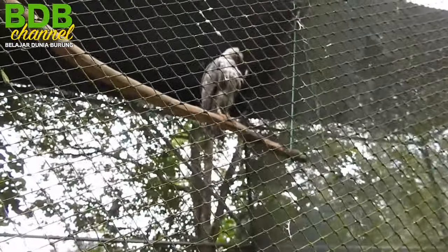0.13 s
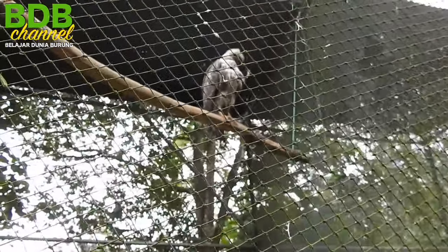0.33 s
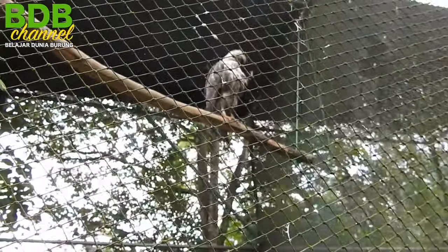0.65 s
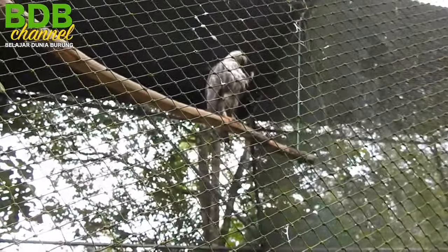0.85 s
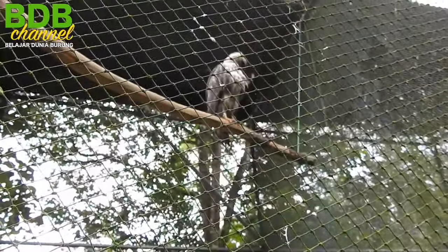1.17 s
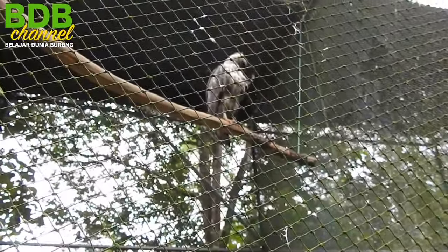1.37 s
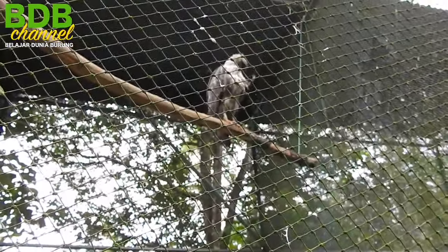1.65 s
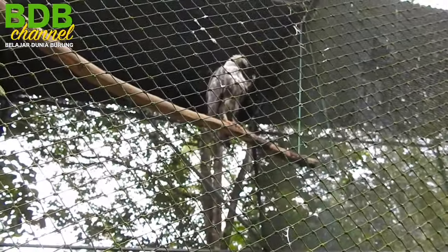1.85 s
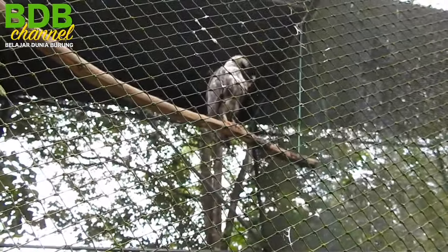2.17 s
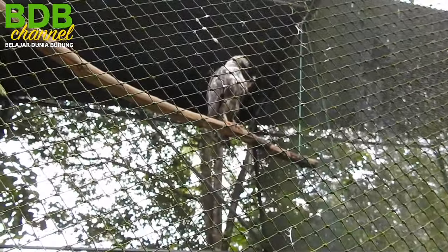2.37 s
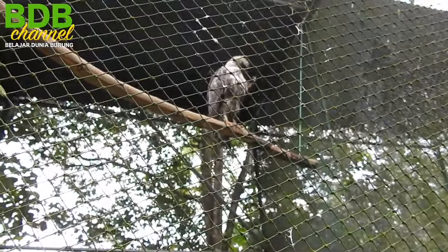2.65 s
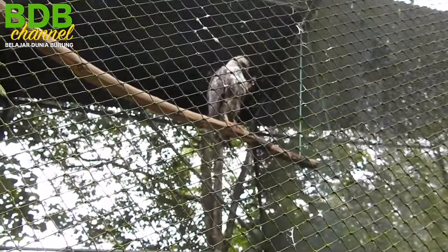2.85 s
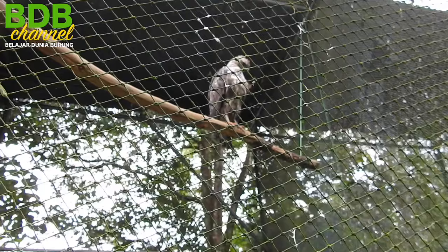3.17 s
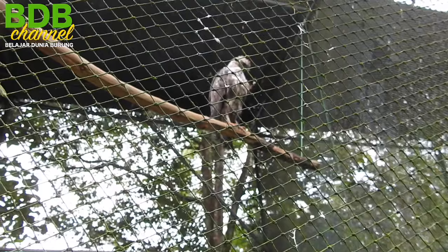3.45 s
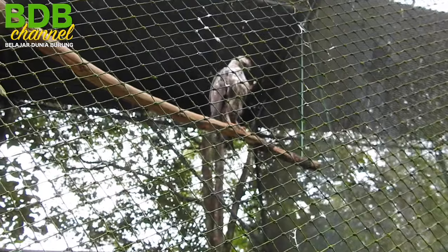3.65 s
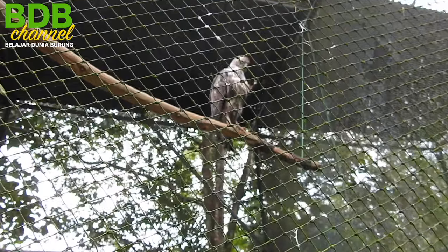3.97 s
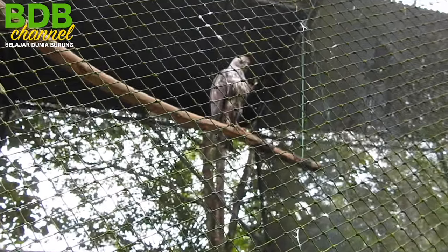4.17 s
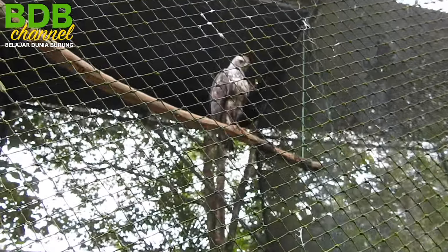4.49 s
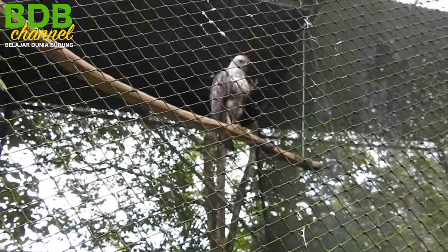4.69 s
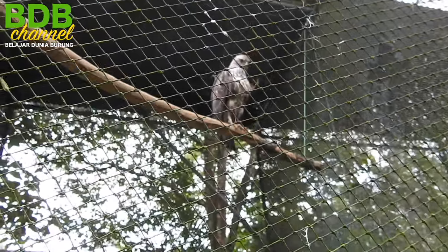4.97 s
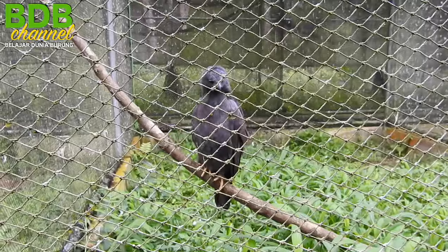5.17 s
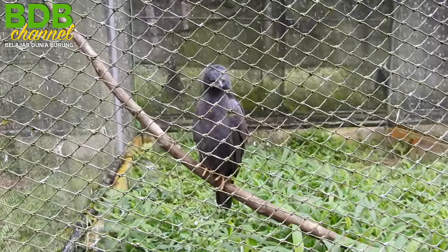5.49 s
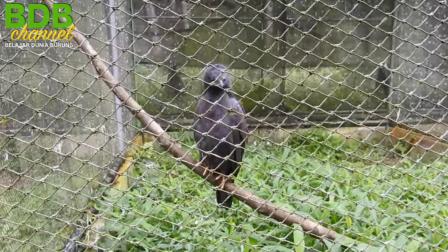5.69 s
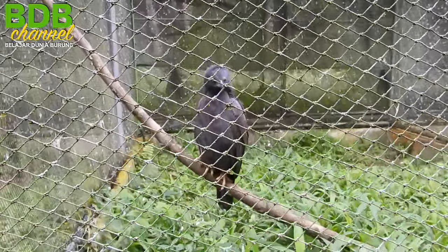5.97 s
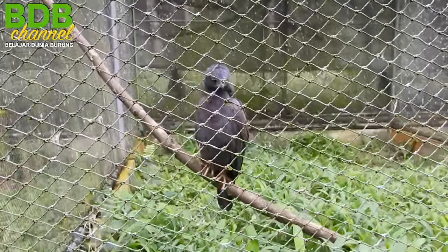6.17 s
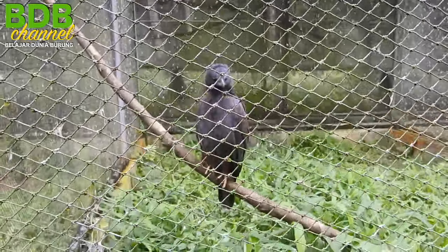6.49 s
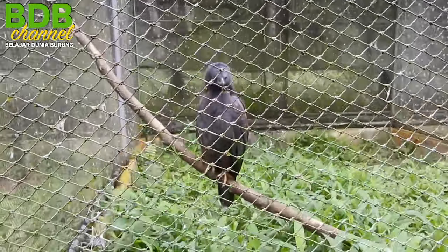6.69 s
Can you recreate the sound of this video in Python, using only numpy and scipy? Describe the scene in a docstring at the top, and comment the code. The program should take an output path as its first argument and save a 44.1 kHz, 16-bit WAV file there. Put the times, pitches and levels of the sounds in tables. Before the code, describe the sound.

Outdoors in an aviary, steady air noise and a high insect-like hiss. Two barely audible yelps, then two clearer hoarse ones from the left, the second loud. Thin high peeps and a soft chirp follow sparsely while a distant bird whistles faintly. Just after five seconds a soft chirp runs into a piercing close scream, then a shorter one; hard walls ring briefly, and strong wind thumps the stereo microphone.

```python
"""Two sharp bird screams close by, in an outdoor aviary: partials of a vibrating membrane that frays and collapses.
Before them come hoarse yelps, thin peeps and soft chirps, built the same way as short pitch arches.
A far bird whistles in wavering sines; light taps are ticks of dying noise.
Behind lie coloured noise for air and an insect-like hiss, and wind buffeting the microphone ports.
Decaying noise stands for the hard cage walls that answer every call."""
import sys
import numpy as np
from scipy import signal
from scipy.fft import rfft, irfft, next_fast_len
from scipy.io import wavfile
from scipy.ndimage import uniform_filter1d, minimum_filter1d, map_coordinates

SR = 44100
rng = np.random.default_rng(int(sys.argv[2]) if len(sys.argv) > 2 else 0)


def store_wav(level_fs):
    """Save 16-bit WAV to argv[1]."""
    pcm = np.round(np.clip(np.atleast_2d(level_fs), -1, 1) * 32767)
    wavfile.write(sys.argv[1], SR, pcm.T.astype(np.int16))


N = 301644


def amp(db):
    """Decibels to gain."""
    return 10 ** (np.asarray(db) / 20)


def unit(x):
    """Scaled to rms 1."""
    return x / np.sqrt(np.mean(x ** 2) + 1e-20)


def along(points, hz):
    """(f/Hz, value) points interpolated on a log frequency axis."""
    f, v = np.transpose(points)
    return np.interp(np.log(hz + 1), np.log(f + 1), v)


def curves(rows, t):
    """Each column after the time, read at the times t."""
    s, *cols = np.transpose(rows)
    return [np.interp(t, s, c) for c in cols]


def wobble(rate_hz, size):
    """Smooth random curve, rate_hz knots a second."""
    knots = rng.standard_normal(int(size * rate_hz / SR) + 4)
    return map_coordinates(knots, [np.arange(size) * rate_hz / SR])


def filtered(x, response):
    """x times a response of frequency."""
    m = next_fast_len(N + SR // 2)
    spectrum = rfft(x, m) * response(np.fft.rfftfreq(m, 1 / SR))
    return irfft(spectrum, m)[..., :N]


def panned(db):
    """Left and right gains for a level difference."""
    return amp(np.array([[.5], [-.5]]) * db)


def add(track, s, sound):
    """Mix a sound in at time s."""
    part = track[..., round(s * SR):][..., :sound.shape[-1]]
    part += sound[..., :part.shape[-1]]


def arch(start, middle, end, u):
    """Parabola through three values as u runs from 0 to 1."""
    return np.polyval(np.polyfit([0, .5, 1], [start, middle, end], 2), np.clip(u, 0, 1))


def rush(spectrum, alike):
    """Coloured stereo noise of rms 1; the mid/side angle sets the left-right correlation."""
    def response(hz):
        angle = np.arccos(np.clip(along(alike, hz), -1, 1)) / 2
        return amp(along(spectrum, hz)) * [np.cos(angle), np.sin(angle)]

    mid, side = filtered(rng.standard_normal((2, N)), response)
    return unit(np.array([mid + side, mid - side]))


# air noise: f/Hz, relative density/dB
AIR_SPECTRUM = [(15, -69), (25, -11.5), (86, 1), (183, 0), (221, -5), (322, -6), (378, -8), (421, -7),
                (648, -7.5), (703, -10), (997, -12.5), (2700, -19), (6730, -13), (10600, -42.5),
                (15500, -42)]
# insect-like hiss: f/Hz, relative density/dB
HISS_SPECTRUM = [(2500, -19), (4500, -14.5), (5600, -9.5), (6600, -4.5), (7300, -13.5), (8200, -20.5),
                 (11000, -35.5), (15000, -50)]
# likeness of the two ports: f/Hz, left-right correlation
PORT_CORRELATION = [(60, 0.84), (200, 0.96), (700, 0.9), (2400, 0.76), (4400, 0.74), (8000, 0.14),
                    (15000, .1)]
AIR_DB, HISS_DB = -41.5, -39
HISS_FALL_S, HISS_FALL_LENGTH_S, HISS_FALL_DB = 5.05, .26, 3.5


def outdoors():
    """Steady wide air noise under a high, slightly wavering hiss that steps down once."""
    fall = np.clip((np.arange(N) / SR - HISS_FALL_S) / HISS_FALL_LENGTH_S, 0, 1)
    hiss_db = HISS_DB - HISS_FALL_DB * fall + 0.61 * wobble(15, N)
    air = amp(AIR_DB) * rush(AIR_SPECTRUM, PORT_CORRELATION)
    return air + amp(hiss_db) * rush(HISS_SPECTRUM, PORT_CORRELATION)


def buffeting(spectrum, lump_db):
    """Turbulence rumbles almost independently at each port, in quick lumps."""
    lumps = unit(amp(lump_db * np.array([wobble(28, N), wobble(28, N)])))
    return lumps * rush(spectrum, [(100, 0.032)])


# light breeze: f/Hz, relative density/dB
BREEZE_SPECTRUM = [(11, -48), (18, -25), (47, -2), (70, 3.5), (118, -4.5), (178, -12), (225, -21.5),
                   (260, -21), (340, -60), (570, -120)]
# separate puffs: middle t/s, length/s, level/dB, L-R/dB
BREEZE_PUFFS = [(0.018, .1, -23, 6), (0.234, 0.16, -33.5, -1.5), (0.365, 0.083, -29, 11),
                (0.59, 0.39, -33, 2), (0.836, 0.29, -26.5, -8.5), (1.174, 0.44, -35.5, -1),
                (1.782, 0.15, -34.5, -13.5), (2.034, 0.13, -38, -12), (2.205, 0.13, -44, -12),
                (4.366, 0.13, -35.5, 9), (4.511, .11, -27, 3), (4.8, 1, -43, 2)]


def breeze():
    """Light puffs of turbulence under half-cosine swells, each with its own left-right balance."""
    t = np.arange(N) / SR
    strength = np.zeros((2, N))
    for s, length, db, pan_db in BREEZE_PUFFS:
        swell = np.cos(np.pi * np.clip((t - s) / length, -.5, .5))
        strength += amp(db) * panned(pan_db) * swell
    return strength * buffeting(BREEZE_SPECTRUM, lump_db=1.5)


# strong wind: t/s, level/dB, L-R/dB before the width factors
STRONG_WIND_CURVE = [(5.1, -19.5, -26.5), (5.21, -18.5, -6), (5.332, -24, -19), (5.434, -17, -8),
                     (5.478, -18, -18), (5.578, -27.5, -17), (5.856, -15.5, 2), (5.948, -13, -9),
                     (6.024, -19, 8), (6.044, -34, 0.0), (6.112, -20, 12), (6.2, -43, -1.5),
                     (6.276, -28.5, -1), (6.428, -41, 10), (6.486, -31, -7.5), (6.534, -28, 16),
                     (6.572, -41.5, 3), (6.796, -21.5, 6), (6.84, -22, -1)]
# strong wind: f/Hz, relative density/dB
STRONG_WIND_SPECTRUM = [(12, -47), (20, -31.5), (63, 4), (117, 1.5), (157, -6), (209, -9.5), (238, -23),
                        (286, -25.5), (439, -50.5), (600, -39), (780, -63), (1320, -120)]
# eddies hitting the ports: t/s, level before attack and decay/dB, f/Hz
EDDY_THUMPS = [(5.096, -10.5, 87), (5.391, -7.5, 132), (5.437, -5.5, 143), (5.726, -8.5, 140),
               (5.808, -21, 105), (5.828, -4, 138), (5.914, -6, 115), (6.777, -9, 72.5)]


def strong_wind(wind_width=0.79, thump_width=0.69, fade_in_s=.015):
    """Strong turbulence, heard late in the scene behind a very short fade-in; eddies are decaying low sines."""
    t = np.arange(N) / SR
    db, pan_db = curves(STRONG_WIND_CURVE, t)
    fade_in = np.clip((t - STRONG_WIND_CURVE[0][0]) / fade_in_s + 1, 0, 1)
    turbulence = buffeting(STRONG_WIND_SPECTRUM, lump_db=1.5)
    out = fade_in * amp(db) * panned(wind_width * pan_db) * turbulence
    t = np.arange(SR // 10) / SR
    attack = 1 - np.exp(-t / 0.00096)
    for s, level_db, hz in EDDY_THUMPS:
        thump = amp(level_db - 60 * t / 0.048) * np.sin(2 * np.pi * hz * t) * attack
        add(out, s, thump * panned(thump_width * pan_db[round(s * SR)]))
    return out


# light taps on the cage: t/s, level before TAP_TRIM_DB/dB, f/Hz
CAGE_TAPS = [(2.012, -20, 1090), (2.077, -16.5, 2050), (6.118, -12.5, 6300)]
TAP_TRIM_DB, TAP_T60_S, TAP_TOP_HZ = -16, 0.059, 6000


def taps():
    """Short dull ticks, each a broad resonance of dying noise."""
    out, t = np.zeros((2, N)), np.arange(SR // 8) / SR
    for s, db, hz in CAGE_TAPS:
        tick = signal.lfilter(*signal.iirpeak(hz, 1.2, SR), rng.standard_normal(len(t)))
        add(out, s, amp(db + TAP_TRIM_DB - 60 * t / TAP_T60_S) * unit(tick))
    return filtered(out, lambda hz: 1 / (1 + (hz / TAP_TOP_HZ) ** 6))


# late tail of the walls: f/Hz, t60/s
CAGE_DECAY = [(300, 0.13), (2200, 0.82), (5000, 0.73), (10000, 0.7)]


def cage(x, early_db, early_t60_s, spread):
    """Wall answer: early echoes with their own decay plus a tail, partly alike at both ports."""
    hz, t, z = signal.stft(rng.standard_normal((2, SR * 3 // 4)), SR, nperseg=256)
    late = amp(-60 * t / along(CAGE_DECAY, hz)[:, None])
    early = amp(early_db - 60 * t / early_t60_s)
    mid, side = signal.istft(z * (late + early) * (t > .005), SR, nperseg=256)[1]
    tail = np.array([mid + spread * side, mid - spread * side])
    return signal.fftconvolve(x, tail / np.linalg.norm(tail[0]), axes=1)[:, :N]


# far bird: t/s, first note length/s, first note f/Hz, mid-note level/dB,
# second note length/s (sounds only above MIN_SECOND_S)
FAR_WHISTLES = [(.465, 0.51, 1367, -51, 0), (.68, 0.26, 2936, -47.5, 0.1), (2.007, 0.4, 2930, -51, 0.43),
                (3.48, .15, 2994, -49, 0.29), (4.745, 0.15, 2998, -47, 0.52),
                (5.66, 0.37, 3065, -51.5, 0.48)]
MIN_SECOND_S, SECOND_AFTER_S, SECOND_RATIO, SECOND_DB = .1, .11, .738, 0.5  # second note re first


def far_bird(waver=0.012, fade_db=6):
    """Wavering sine whistles, often overlapped by a lower note, each fading a little."""
    out, notes = np.zeros((2, N)), []
    for s, length, hz, db, second_length in FAR_WHISTLES:
        notes.append((s, length, hz, db))
        if second_length > MIN_SECOND_S:
            notes.append((s + SECOND_AFTER_S, second_length, hz * SECOND_RATIO, db + SECOND_DB))
    for s, length, hz, db in notes:
        size = int(length * SR)
        phase = 2 * np.pi * np.cumsum(hz * (1 + waver * wobble(163, size))) / SR
        level = amp(db + fade_db * np.linspace(.5, -.5, size))
        add(out, s, level * np.sin(phase) * signal.windows.tukey(size, .25))
    return out + amp(-1) * cage(out, early_db=-26, early_t60_s=.2, spread=0.37)


def syrinx(pitch_hz, rough, jitter, rasp_hz):
    """Phase of the vibrating membrane, and the random complex swing that blurs partials into a rasp."""
    size = len(pitch_hz)
    phase = 2 * np.pi * np.cumsum(pitch_hz * (1 + jitter * wobble(300, size))) / SR
    pole = np.exp(-2 * np.pi * rasp_hz / SR)
    noise = rng.standard_normal((2, size))
    swing = unit(signal.lfilter([1], np.poly([pole, pole]), noise))
    return phase, rough * (swing[0] + 1j * swing[1])


def partial(multiple, phase, rasp, lead_rad):
    """One partial at both ports, lead_rad apart; the higher it lies, the more it rasps."""
    port_phase = multiple * phase + np.array([[.5], [-.5]]) * lead_rad
    return np.imag((1 + multiple * rasp) * np.exp(1j * port_phase))


def call(length_s, hz, db, rough, start, end, sag, overtone_db, closing_db, lead_rad, release_s, hoarse):
    """A call swells along a pitch arch, then flicks down and frays as the pressure drops."""
    # start, end: shares of hz; sag: share of pitch lost; hoarse: rasp factor of the overtones
    t = np.arange(int((length_s + release_s) * SR)) / SR
    slack = np.clip((t - length_s) / release_s, 0, 1)
    pitch_hz = hz * arch(start, 0.98, end, t / length_s) * (1 - sag * slack)
    phase, rasp = syrinx(pitch_hz, rough + 1.1 * sag * slack, jitter=0.0054, rasp_hz=460)
    swell_db = np.interp(t / length_s, [0, .25, .55, .85, 1.05], [-15, -3, 0, -1, closing_db])
    swell_db -= 16 * slack
    voice = partial(1, phase, rasp, lead_rad)
    for k, level_db in enumerate([overtone_db, overtone_db - 13], 2):
        voice = voice + amp(level_db) * partial(k, phase, hoarse * rasp, k * lead_rad)
    return voice * amp(db + swell_db) * signal.windows.tukey(len(t), .08)


def perched(s, sound, pan_db, echo_db):
    """A call at time s, placed left-right, with the answer of the walls."""
    out = np.zeros((2, N))
    add(out, s, sound * panned(pan_db))
    return out + amp(echo_db) * cage(out, early_db=9.0, early_t60_s=0.26, spread=0.26)


# thin peeps: t/s, length before release/s, start f/Hz, reference f/Hz (2 % above mid-call),
# end f/Hz, level/dB
THIN_PEEPS = [(2.669, .062, 4480, 4295, 4410, -30), (4.21, .05, 4410, 4300, 4090, -28)]


def peeps():
    """High, almost level notes whose pitch drops sharply in the release."""
    out = np.zeros((2, N))
    for s, length, start_hz, hz, end_hz, db in THIN_PEEPS:
        peep = call(length, hz, db, rough=.11, start=start_hz / hz, end=end_hz / hz, sag=0.4,
                    overtone_db=-22, closing_db=-2, lead_rad=-1.15, release_s=0.022, hoarse=1)
        out += perched(s, peep, pan_db=2, echo_db=-6)
    return out


# soft chirps: t/s, length before release/s, reference f/Hz (2 % above mid-call), level/dB,
# octave re fundamental/dB, echo/dB
CHIRPS = [(3.668, 0.066, 1570, -25.5, -5, -9), (5.003, 0.074, 1629, -18, -11.5, -34)]


def soft_chirps():
    """Low, clean, shallow pitch arches with a strong octave, near the centre."""
    out = np.zeros((2, N))
    for s, length, hz, db, overtone_db, echo_db in CHIRPS:
        chirp = call(length, hz, db, rough=0.026, start=0.93, end=0.92, sag=0.044,
                     overtone_db=overtone_db, closing_db=-3, lead_rad=0.19, release_s=0.02, hoarse=0.82)
        out += perched(s, chirp, pan_db=1.0, echo_db=echo_db)
    return out


# hoarse yelps: t/s, length before release/s, reference f/Hz (2 % above mid-call), level/dB,
# roughness (ratio), opening rasp level/dB
HOARSE_YELPS = [(0.385, 0.053, 2120, -46.5, .3, -60), (.585, .07, 2066, -44, 1, -46),
                (.86, .06, 1989, -24.5, 0.17, -34), (1.191, 0.07, 2154, -14.5, 0.04, -37.5)]
CATCH_LEAD_S, CATCH_HZ = .02, 2123  # opening rasp


def yelps():
    """From the left: a rasp opens each yelp, which clears into a pitch arch with a ragged overtone."""
    out = np.zeros((2, N))
    for s, length, hz, db, rough, catch_db in HOARSE_YELPS:
        catch = call(CATCH_LEAD_S * 1.5, CATCH_HZ, catch_db, rough=0.6, start=1.01, end=0.89, sag=0.07,
                     overtone_db=-25, closing_db=-17, lead_rad=.3, release_s=.025, hoarse=1)
        overtone_db = np.interp(rough, [.05, .2], [-24, -16])
        yelp = call(length, hz, db, rough, start=.835, end=0.93, sag=.36, overtone_db=overtone_db,
                    closing_db=-17.5, lead_rad=.15, release_s=.04, hoarse=1.5)
        out += perched(s - CATCH_LEAD_S, catch, pan_db=9.0, echo_db=5)
        out += perched(s, yelp, pan_db=8.5, echo_db=-2.0)
    return out


# near screams: t/s, time before the held pitch/s (a short low note, only about 2 ms in the first), held
# length/s, # start f/Hz, middle f/Hz, end f/Hz, fundamental before trim/dB, its dip before the hollow curve/dB,
# # octave before trim/dB, overtone growth over the call/dB, third harmonic re octave/dB, # fundamental L-R/dB
NEAR_SCREAMS = [(5.092, 0.0021, .18, 2655, 2629, 2577, -9, 25, -14, -9.5, -16, 0.5),
                (5.558, .021, .086, 2483, 2517, 2485, -14.5, 7.5, -22, 7.5, -11.5, 0)]
FUNDAMENTAL_TRIM_DB, OVERTONE_TRIM_DB = 5.5, 1.5
ATTACK_S, OCTAVE_LAG_S = 0.0036, 0.0085  # fundamental speaks first, overtones follow
LOW_NOTE_HZ, LOW_RISE_HZ_PER_S, LOW_NOTE_DB, LOW_OCTAVE_DB = 2115, 3050, -1.5, 4.5
COLLAPSE_S, COLLAPSE_DROP, COLLAPSE_DB, OVERTONE_LOSS_DB = 0.041, .46, 43.5, 4  # drop: share of pitch
FRAY_S = 0.037  # voice roughens this long before the collapse


def screams(half_db=-23, fourth_db=-33, lead_rad=1.58, rough=0.013, fray=0.051, broken=.8):
    """Nearly pure cries; the second breaks upward from a short low note; both hollow and collapse."""
    out = np.zeros((2, N))
    for (s, low_s, length, start_hz, middle_hz, end_hz, db, dip_db, octave_db, growth_db,
         third_db, pan_db) in NEAR_SCREAMS:
        t = np.arange(int((low_s + length + COLLAPSE_S) * SR)) / SR
        since_held = t - low_s
        u = np.clip(since_held / length, 0, 1)
        low = np.clip(-since_held / 0.0024, 0, 1)
        slack = np.clip((since_held - length) / COLLAPSE_S, 0, 1)
        strain = np.clip((since_held - length) / FRAY_S + 1, 0, 1)

        low_hz = LOW_NOTE_HZ + LOW_RISE_HZ_PER_S * t
        held_hz = arch(start_hz, middle_hz, end_hz, u)
        pitch_hz = (low * low_hz + (1 - low) * held_hz) * (1 - COLLAPSE_DROP * slack)
        roughness = rough + fray * strain + broken * slack
        phase, rasp = syrinx(pitch_hz, roughness, jitter=0.0039, rasp_hz=494)

        hollow_db = dip_db * np.interp(u, [.09, .23, .58, .88], [0.065, 0.47, 0.78, 0.38])
        attack = np.clip(t / ATTACK_S, 0, 1)
        fundamental = amp(db + FUNDAMENTAL_TRIM_DB - hollow_db) * attack * partial(1, phase, rasp, -0.62)

        multiples = [1.5, 2, 2.5, 3, 4, 5]  # faint half-orders among the harmonics
        levels_db = [half_db - 9.5, 0, half_db, third_db, fourth_db, fourth_db - 19]  # re octave
        # short waves reach the ports out of step
        upper = sum(amp(level_db) * partial(k, phase, rasp, lead_rad)
                    for k, level_db in zip(multiples, levels_db))
        since_start = np.where(t < low_s, t, since_held)  # restarts at the held pitch
        late_attack = np.clip((since_start - OCTAVE_LAG_S) / ATTACK_S, 0, 1)
        bright_db = octave_db + growth_db * (u - .5) + LOW_OCTAVE_DB * low - OVERTONE_LOSS_DB * slack
        overtones = amp(bright_db + OVERTONE_TRIM_DB) * late_attack * upper

        voice = fundamental * panned(pan_db) + overtones * panned(1.3)
        add(out, s, voice * amp(LOW_NOTE_DB * low - COLLAPSE_DB * slack ** 0.72))
    return out + amp(-4.0) * cage(out, early_db=8.5, early_t60_s=0.43, spread=0.35)


def scene():
    """All sources at the microphone."""
    background = outdoors() + breeze() + strong_wind() + taps() + far_bird()
    return background + peeps() + soft_chirps() + yelps() + screams()


TOP_HZ = 15750


def record(dry, limit_db=-13, hold_s=0.027, low_cut_hz=33):
    """Gain control, deaf to rumble, ducks above limit_db; deepest bass cut, nothing from TOP_HZ up."""
    heard = filtered(dry, lambda hz: 1 - 1 / (1 + (hz / 500) ** 4))
    power = uniform_filter1d(np.mean(heard ** 2, axis=0), SR // 200)
    level = np.sqrt(np.abs(power) + 1e-12)
    size = max(int(hold_s * SR), 3)
    gain = np.minimum(1, amp(limit_db) / level)
    held = minimum_filter1d(gain, size, origin=(size - 1) // 2)
    smooth = uniform_filter1d(held, SR // 200)
    return filtered(dry * smooth, lambda hz: (hz < TOP_HZ) * hz ** 2 / np.hypot(hz ** 2, low_cut_hz ** 2))


dry = scene()
out = record(dry)
store_wav(out)
```